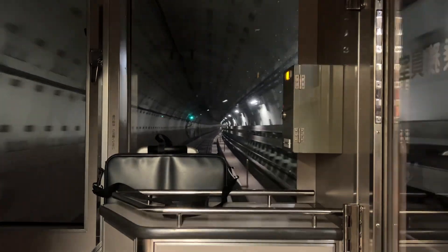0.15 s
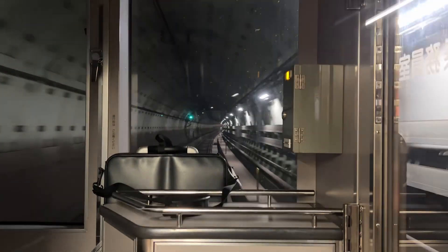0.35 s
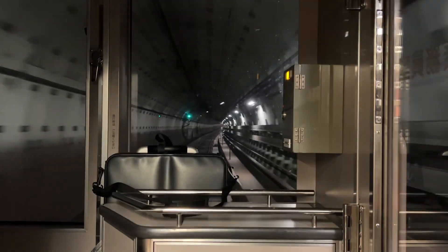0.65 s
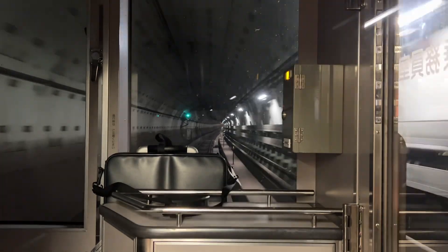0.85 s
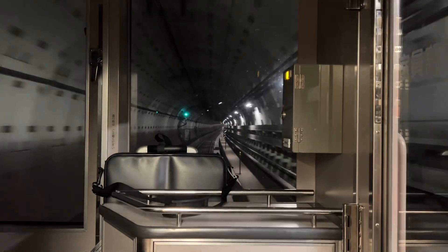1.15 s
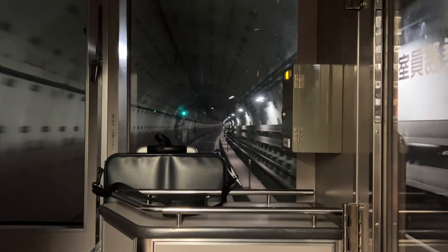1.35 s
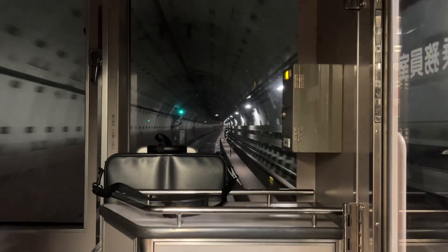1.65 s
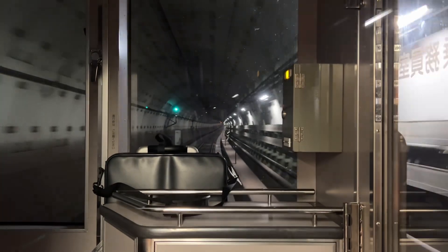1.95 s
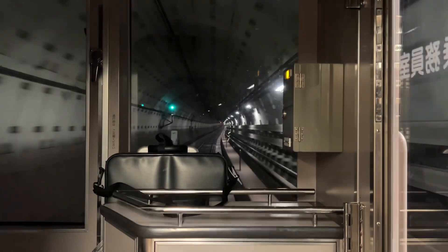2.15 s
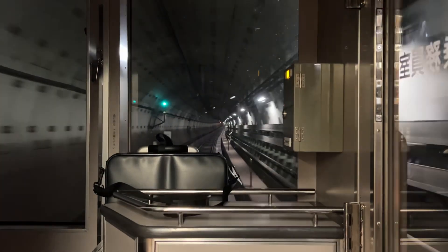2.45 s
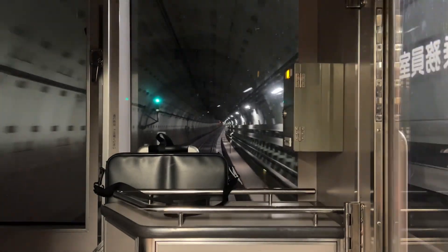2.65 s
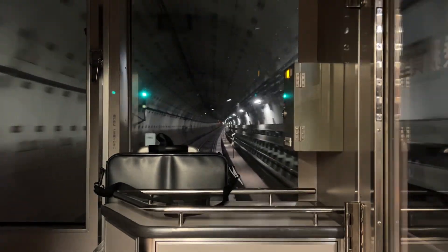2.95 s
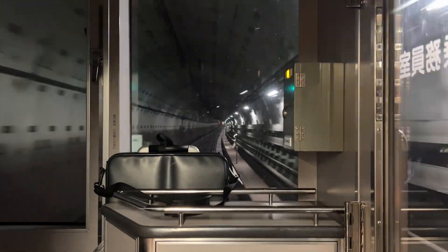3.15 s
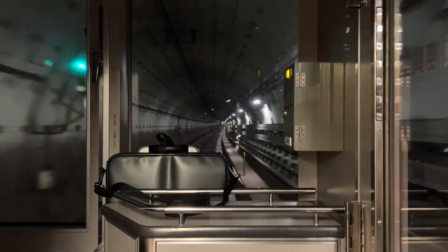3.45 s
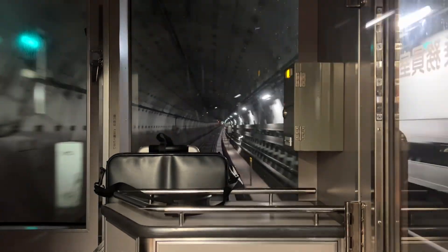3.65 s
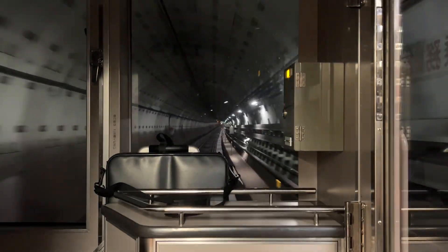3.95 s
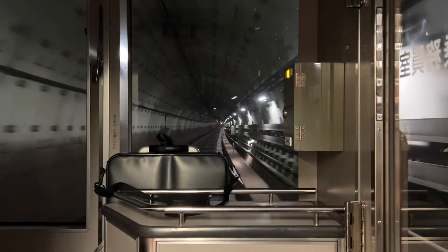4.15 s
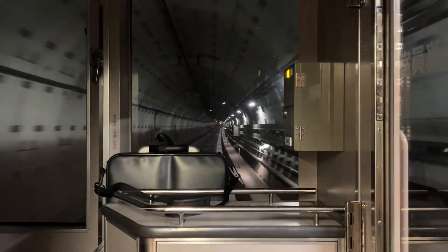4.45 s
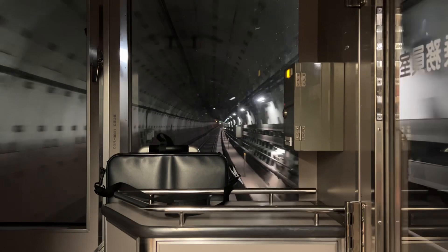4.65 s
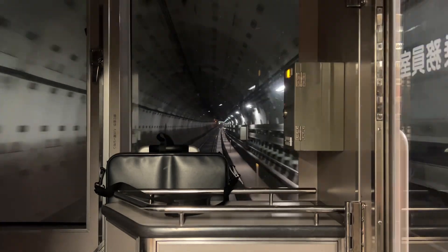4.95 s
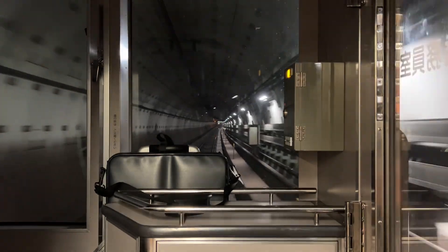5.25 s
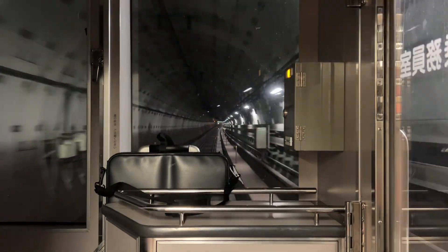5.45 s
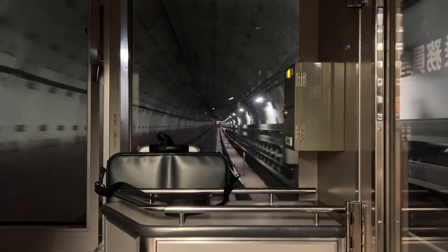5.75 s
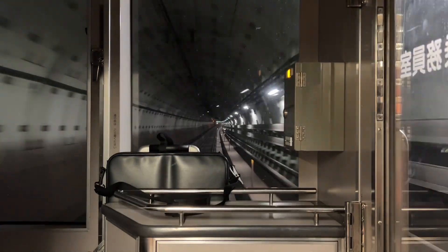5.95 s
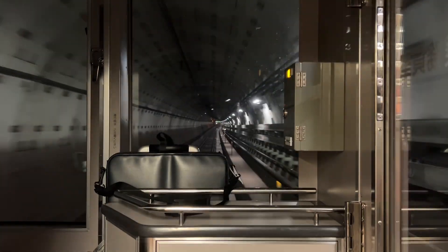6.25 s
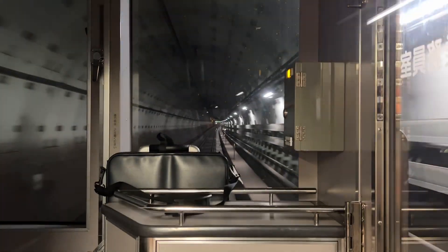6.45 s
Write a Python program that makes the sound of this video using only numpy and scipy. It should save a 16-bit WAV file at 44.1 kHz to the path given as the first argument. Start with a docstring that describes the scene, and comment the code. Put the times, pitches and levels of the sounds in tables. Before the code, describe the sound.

Inside the front car of an electric train in a tunnel, a close stereo microphone hears steady deep floor rumble, a muffled airy rush of wheels and a wavering low hum. From 0 to 1.4 seconds, cloth near the microphone rustles, scuffs and ticks in fine, crisp grains, then mostly quietens. The hum grows gently around 1.8 and 2.5 seconds, with a rougher boom near 3. A tiny dry tap sounds at about 3.3. From 3.7 the car body shudders in uneven booms; at about 4.1 and 4.2 two axles clatter over a rail joint, with short metallic ringing and heavy body thumps. It eases by 4.7, then a broader rush and panel roar swell around 5.1. Afterwards the rush recedes but the low boom remains strong and unsteady, with cloth rubbing more noticeably from 5.2, especially near 5.6 to 5.8, until the end at 6.6.

```python
"""Inside the front car of an electric train in a tunnel, heard through two microphone ports.
From the start the floor rumbles, wheels and tunnel rush, and rough rail makes the car body hum, boom and roar:
all are noise shaped by spectra or resonances. Cloth near the ports rustles, scuffs and ticks in fine noise grains.
A dry tap, a short ring, comes at about 3.3 s. From about 4.1 s two axles knock over a rail joint: noise and
fading tones sound the wheel resonances, and the body booms after each axle."""
import sys
import numpy as np
from scipy import signal
from scipy.fft import rfft, irfft, next_fast_len
from scipy.io import wavfile
from scipy.ndimage import uniform_filter1d, minimum_filter1d, map_coordinates

SR = 44100
rng = np.random.default_rng(int(sys.argv[2]) if len(sys.argv) > 2 else 0)


def persist_wave(psi):
    """Save psi, clipped to +-1, as 16-bit WAV."""
    counts = np.round(np.clip(psi, -1, 1) * 32767).astype(np.int16)
    wavfile.write(sys.argv[1], SR, np.atleast_2d(counts).T)


N = 291501

# Level of the lowest bass in the floor rumble: (time [s], level over the rest [dB])
DEEP_BASS = [(0, 4), (1, -2), (1.9, 2), (2.6, -1.5), (3.2, 1), (4.5, -4.5), (5.2, 0.5), (6, -8.5),
             (6.61, -7)]
# Rush of wheels and tunnel: (time [s], level [dB], its lower part over the rest [dB])
TUNNEL_RUSH = [(0, -34.5, 0.5), (.7, -35.5, 1.5), (1.4, -36.5, 1), (2.3, -36, -0.5), (3.3, -36, 0.5),
               (3.6, -38, 0), (4.04, -37, 2.5), (4.12, -28, -5), (4.19, -31, 6.5), (4.3, -29, -6.5),
               (4.45, -34.5, 5), (4.75, -38, 0), (4.88, -37.5, 3), (4.96, -31.5, 1), (5.08, -30, 0),
               (5.17, -31.5, 0), (5.3, -34, -2.5), (5.9, -34.5, 2.5), (6.2, -36.5, -7), (6.61, -37.5, -5)]
# Rail roughness under the car: (time [s], low boom [dB], upper boom [dB], panel roar [dB])
RAIL_ROUGHNESS = [(0.0,-34,-32.5,-34.5), (0.37,-26,-38,-34.5), (1.08,-30.5,-39.5,-34.5),
                  (1.5, -28, -29, -34), (1.7, -25.5, -29, -34), (1.82,-22.5,-24,-32),
                  (1.95, -27.5, -27, -34), (2.17,-27.5,-34.5,-36), (2.39,-32.5,-28.5,-34.5),
                  (2.47,-22,-27.5,-34.5), (2.83,-24.5,-29.5,-33.5), (2.93, -24, -25.5, -27),
                  (3.05,-21,-18.5,-24.5), (3.28,-25,-26.5,-32.5), (3.64,-28,-29.5,-34),
                  (3.7, -26.5, -21.5, -28), (3.74, -16, -22.5, -26), (3.78, -23.5, -15, -25),
                  (3.83, -14, -22.5, -25.5), (3.88, -16.5, -17, -25.5), (3.91, -23.5, -27.5, -26),
                  (3.95,-15.5,-13,-27), (4.03,-29.5,-29.5,-29), (4.11, -14.5, -27, -25),
                  (4.16,-16,-24.5,-26), (4.25,-20,-22,-25.5), (4.34, -15.5, -28.5, -27),
                  (4.37, -27, -20, -28.5), (4.4,-14.5,-31,-30.5), (4.55,-26.5,-26,-31), (4.7,-24,-24,-31),
                  (4.87,-24.5,-26.5,-33), (4.93,-19,-21,-24), (4.99, -20, -16, -23.5),
                  (5.03, -20, -22, -21.5), (5.07, -15, -16, -20.5), (5.12,-22.5,-18.5,-22.5),
                  (5.18, -18.5, -19, -23), (5.27,-20.5,-23,-25.5), (5.36, -19, -24.5, -26.5),
                  (5.7,-24,-25.5,-31), (5.8, -18.5, -27, -26.5), (5.84, -19.5, -25, -28.5),
                  (5.87,-15.5,-26.5,-26), (6.0, -18, -23, -26.5), (6.1, -17.5, -23.5, -27.5),
                  (6.27, -17.5, -24.5, -29.5), (6.5,-17,-25.5,-28.5), (6.61,-27.5,-29,-31.5)]
# Slow changes of the boom's colour: (time [s], gain of its lowest part [dB], gain of its highest part [dB])
BOOM_COLOUR = [(0, -8, 0.5), (.9, -9, -6), (1.5, 3.5, 0), (1.85, 5, -0.5), (2.3, 7, -3), (2.7, 3, 2.5),
               (3.05, 8, 6), (3.5, -7, 1), (3.75, -1.5, -5.5), (3.95, -2, -10), (4.1, 3, 1.5),
               (4.25, 4.5, 0.5), (4.42, -0.5, -6), (4.65, 8.5, -13), (4.95, 6, 3), (5.15, 9, 5.5),
               (5.4, -2, 1), (5.75, 2, 1.5), (6.0, 3, -3), (6.27, -8, 2), (6.5, 1, -6), (6.61, 7, 4)]
# Ripples worn into the rail pass under the wheels at a wandering rate: (time [s], rate [Hz])
RIPPLE_RATE = [(0, 200), (.45, 188.3), (.9, 188.6), (1.3, 196), (1.65, 180), (1.82, 227.5), (2.1, 225),
               (2.45, 190), (2.75, 231.7), (3.0, 214.5), (3.3, 239), (3.6, 195), (3.74, 195), (3.8, 233.7),
               (3.87, 215), (3.95, 226), (4.1, 239), (4.2, 231.9), (4.26, 190), (4.42, 212), (4.7, 210),
               (4.92, 222), (4.99, 245), (5.04, 180), (5.11, 245), (5.18, 239), (5.26, 210), (5.33, 203),
               (5.39, 235.4), (5.5, 190), (5.61, 227), (5.72, 195.5), (5.8, 209.8), (5.87, 204.3),
               (5.93, 185.2), (6.0, 212), (6.06, 189.6), (6.15, 215), (6.27, 232.4), (6.34, 203),
               (6.44, 208), (6.5, 174.8), (6.61, 205)]
# Cloth rubbing near the ports:
# (time [s], level [dB], relative top treble [dB], relative band near 5.4 kHz [dB])
CLOTH_RUB = [(0, -59.5, -2.5, -4), (.14, -42.5, -1.5, -16), (.3, -53, -2, -6), (.5, -50, -1, -6),
             (.6, -51, -5, -6), (.75, -57, -0.5, -10), (1.1, -59.5, -2.5, 2), (1.3, -58.5, -5.5, -6),
             (1.45, -61, -5, -20), (2.15, -55.5, -2, -1), (2.55, -53.5, -8, 5), (2.8, -60.5, -0.5, -5),
             (2.92, -52, -3, 6), (3.4, -48.5, -2, 3), (3.65, -59.5, -2, -1), (3.75, -55.5, -3, -3),
             (3.84, -49.5, -2.5, 6), (4.22, -50, -7.5, -1), (4.34, -59.5, -9.5, -7), (4.48, -61, -3, -8),
             (4.59, -63, -7, -8), (4.65, -53, -4.5, 6), (4.72, -50.5, -2.5, 9), (5.12, -49.5, -6, 0),
             (5.2, -45, -0.5, -10), (5.36, -49, 0, -6), (5.58, -42.5, -1, -6), (5.68, -45, -2.5, -1),
             (5.73, -46, 1.5, -4), (5.75, -40.5, 0, 8), (5.77, -44.5, 0, -3), (5.8, -52.5, -2.5, 6),
             (6.05, -54.5, -5.5, -5), (6.13, -48, 0, -2), (6.28, -47, 0.5, -6), (6.4, -51.5, 2.5, -5),
             (6.47, -45, 0, -6), (6.61, -56.5, -3.5, -6)]
# Scuffs of the cloth:
# (time [s], level [dB], time to fall 60 dB [s], relative low treble [dB], relative top treble [dB])
CLOTH_SCUFFS = [(0.0363, -46.5, .12, -3, -5.5), (0.096, -50, .14, -3, 2), (0.138, -46.5, .08, -7, 0),
                (0.1506, -38.5, 0.11, -8, -5), (0.2417, -46, .1, 2, 0.5), (0.3212, -46.5, .08, 2, 4.5),
                (0.34, -39, 0.085, 5, 3), (0.411, -46, 0.089, 0, 3), (0.4647, -50, .18, -3, -3.5),
                (0.484, -49, 0.13, 5, -5), (0.504, -48, .18, 9, 3.5), (0.632, -51, .06, -3, 5.5),
                (0.777, -56.5, .14, -2, 2), (0.8585, -48, 0.12, 8, -2), (0.9562, -56, .13, 0, 1),
                (0.9852, -49.5, 0.29, 0, 0), (1.138, -48, 0.12, 8, -8), (1.163, -55, .05, -6, 4.5),
                (1.2296, -50.5, 0.075, -7, 0), (1.2457, -49, .1, 0, 1.5), (1.258, -37, 0.18, 1, -2.5),
                (1.298, -53, 0.18, 4, 0), (1.3687, -49, 0.18, -9, 3), (2.941, -48, 0.12, 3, 1.5),
                (3.044, -49.5, 0.15, 0, 0), (5.172, -47, 0.18, -5, 4), (5.3, -46.5, 0.11, -5, 0),
                (5.45, -51.5, .12, -6, 4), (6.0035, -49, 0.19, 1, 0), (6.049, -51.5, .16, 4, -1),
                (6.4104, -49.5, .19, 2, -1)]
# Ticks of the cloth: (time [s], size of the snap before its colour is added [dB])
CLOTH_TICKS = [(0.141, -27), (0.3215, -27.5), (0.3415, -28.5), (0.4115, -28.5), (0.468, -32.5),
               (0.507, -29.5), (0.632, -32.5), (0.703, -32.5), (0.846, -19.5), (0.988, -34.5),
               (1.262, -28.5), (1.371, -22), (1.4004, -36), (3.6133, -28), (6.411, -23.5)]
# A dry tap in the car: (time [s], level [dB], pitch [Hz], time to fall 60 dB [s])
DRY_TAP = (3.2835, -15, 2400, .006)
# Two axles clatter over a joint: (time [s], level [dB], relative upper modes [dB])
AXLES_AT_JOINT = [(4.063, -17, 1.5), (4.204, -17, -2.5)]

# Resonances of the wheels, low car body and upper car body: (centre [Hz], width [Hz], level [dB])
WHEEL_MODES = [(773, 86, 2), (965, 130, -4), (1350, 78, -4.5), (1940, 100, -4), (2140, 217, -10),
               (2740, 250, -19.5), (3850, 390, -27.5), (5530, 450, -23.5)]
LOW_BODY_MODES = [(158, 40, -7), (203, 24, -1), (236, 18, 1)]
HIGH_BODY_MODES = [(272.3, 32, 2.5), (338.7, 39.5, 2), (371.3, 55, -3)]
# Spectra of the floor rumble, panel roar and tunnel rush: (frequency [Hz], relative level [dB])
FLOOR_SPECTRUM = [(11, -56.5), (18, -28.5), (36, -9.5), (49, -1), (93, 3), (108, -2), (125, -2.5),
                  (200, -4.5), (260, -29.5), (440, -120)]
PANEL_SPECTRUM = [(190, -36), (330, -12.5), (410, -2), (579, -5.5), (692, -4.5), (805, -16), (858, -12),
                  (1200, -34.5), (1560, -54.5), (2640, -120)]
RUSH_SPECTRUM = [(470, -14), (800, -1.5), (1000, -2.5), (1200, -5), (1360, -2), (1520, -7), (1680, -9.5),
                 (1800, -7), (1980, -9.5), (2150, -8.5), (2450, -8.5), (2850, -14), (3150, -18.5),
                 (3500, -26.5), (5000, -27.5), (6500, -36), (9000, -120)]
# Cloth spectra, for the ports' sum (mid) and difference (side): (frequency [Hz], relative level [dB])
CLOTH_MID_SPECTRUM = [(1900, -13), (3200, -2), (3800, -8.5), (5000, -7.5), (6600, 1.5), (7200, -3),
                      (8300, -3), (9000, -9), (9550, -26), (9700, -73), (10850, -73), (11050, -11),
                      (12300, -4), (15600, -13.5)]
CLOTH_SIDE_SPECTRUM = [(1900, -42), (3200, -5), (4450, -13.5), (5950, -10), (6300, -6.5), (6500, -28.5),
                       (6900, -24), (7700, -24), (8800, -11), (12200, -9), (12900, -31), (13500, -34),
                       (14100, -20), (15600, -16)]
# How far the ports disagree: (frequency [Hz], side minus mid [dB])
PORTS_APART = [(30, -16), (60, -23), (92, -26), (140, -21), (210, -12.5), (330, -3), (500, -5), (770, 0),
               (1170, 0), (1400, -1.5), (1750, 1), (2100, -13), (2450, -14), (2900, -4.5), (3500, -2),
               (4500, -4), (6400, -14)]
# Share of the side that is the mid arriving earlier on the left: (frequency [Hz], share, negative = later)
LEFT_LEAD = [(150, 0), (300, -.3), (560, -.3), (800, .3), (1030, .4), (1300, 0), (1640, -.4), (2000, 0),
             (3200, .4), (5000, 0)]
# Balance of the ports: (frequency [Hz], left minus right [dB])
PORT_LEAN = [(100, .3), (190, -.9), (400, -.8), (1400, -1.7), (2900, 2.3), (4900, 3.4), (6100, 1.3),
             (6600, 0)]

# Floor rumble: level, random sway, sways a second, dB gained per dB of boom
RUMBLE_DB, RUMBLE_SWAY_DB, RUMBLE_SWAYS, RUMBLE_FOLLOWS = -25.5, 1.5, 7.9, 0.13
RUSH_SWAY_DB, RUSH_SWAYS = 0.6, 5.3  # the rush sways a little: depth, sways a second
SING_DB = -8  # wheel modes singing in the rush: level over it
BOOM_SWAY_DB, BOOM_SWAYS = 1.5, 14  # the boom sways at random: depth, sways a second
BROAD_DB = -1.5  # gain of the broad shaking of the low modes
# Hum of the rail ripples: gain within the boom, spread, side over mid
RIPPLE_DB, RIPPLE_WIDTH_HZ, RIPPLE_SIDE_DB = -3.5, 18.8, -11.5
# Body boom after each axle: level over the clatter setting, lag, rise, time to fall 60 dB
THUMP_DB, THUMP_LAG_S, THUMP_RISE_S, THUMP_T60_S = 2.5, 0.014, 0.014, 0.1
PORT_LAG_S = 1 / 6700  # the cloth is nearer the right port
KNOCKS, KNOCK_GAP_S, KNOCK_T60_S = 3, 0.02, 0.26  # each axle: knocks, spacing, time to fall 60 dB
WHEEL_SHARP = 1.25  # above 1 the clatter has darker valleys between the wheel modes
# Free ringing after each knock: least gain, largest random extra gain, time to fall 60 dB
RING_DB, RING_EXTRA_DB, RING_T60_S = -7.3, 7.4, 0.19
TOP_HZ = 15750  # nothing is kept above this


def amp(db):
    """Turns decibels into gain."""
    return 10 ** (np.asarray(db) / 20)


def unit(x):
    """Scales a sound to an average (rms) size of 1."""
    return x / np.sqrt(np.mean(x ** 2) + 1e-20)


def along(points, hz):
    """Reads (frequency, value) points at any pitch, evenly along a log scale."""
    f, v = np.transpose(points)
    return np.interp(np.log(hz + 1), np.log(f + 1), v)


def curves(rows):
    """Draws lines through a table: one value per sample for each column after the time."""
    s, *cols = np.transpose(rows)
    return [np.interp(np.arange(N) / SR, s, c) for c in cols]


def wobble(rate):
    """A smooth random curve with this many random points a second."""
    points = rng.standard_normal(int(N * rate / SR) + 4)
    return map_coordinates(points, [np.arange(N) * rate / SR])


def filtered(x, response):
    """Strengthens or weakens each frequency of x by the response."""
    m = next_fast_len(N + SR // 2)
    return irfft(rfft(x, m) * response(np.fft.rfftfreq(m, 1 / SR)), m)[..., :N]


def modes(table):
    """Adds resonances, each strongest at its own pitch, with alternating signs."""
    def response(f):
        return sum((-1) ** k * amp(db) * 1j * f * w / (c * c - f * f + 1j * f * w)
                   for k, (c, w, db) in enumerate(table))
    return response


def shape(points):
    """A response that follows a spectrum."""
    return lambda hz: amp(along(points, hz))


def field(response, patchy_db):
    """Noise, uneven over time and pitch, shaped into (mid, side) with mid at average size 1."""
    grid = signal.stft(rng.standard_normal((2, N)), nperseg=1024)[2]
    patches = rng.standard_normal(grid.shape[1:])
    for axis in (0, 1):
        patches = uniform_filter1d(patches, size=5, axis=axis)
    mid, other = signal.istft(grid * amp(patchy_db * unit(patches)), nperseg=1024)[1][:, :N]

    def spread(hz):
        lead = np.clip(along(LEFT_LEAD, hz), -1, 1)
        apart = amp(along(PORTS_APART, hz))
        # 1j moves each wave a quarter cycle earlier
        return response(hz) * [np.ones_like(hz), 1j * lead * apart, np.sqrt(1 - lead ** 2) * apart]
    mid, early, free = filtered(np.array([mid, mid, other]), spread)
    return np.array([mid, early + free]) / np.std(mid)


def swell(s, rise, t60):
    """An envelope that rises from time s and dies away."""
    t = np.maximum(np.arange(N) / SR - s, 0)
    return (1 - np.exp(-t / rise)) * amp(-60 * t / t60)


def steadied(pair, seconds, share):
    """Evens out part of the slow beating of narrow noise."""
    level = np.sqrt(np.abs(uniform_filter1d(pair ** 2, size=int(seconds * SR), axis=1))) + 1e-6
    even = pair * (np.std(pair, axis=1, keepdims=True) / level) ** np.clip(share, 0, 1)
    return even / np.std(even[0])


def floor_rumble():
    """The floor shakes at low pitches, a little harder when the rail makes the body boom."""
    boom_db = curves(RAIL_ROUGHNESS)[0]
    follow_db = RUMBLE_FOLLOWS * (boom_db - boom_db.mean())
    level = amp(RUMBLE_DB + follow_db + RUMBLE_SWAY_DB * wobble(RUMBLE_SWAYS))
    rumble = level * steadied(field(shape(FLOOR_SPECTRUM), patchy_db=-2.5), seconds=0.067, share=0.65)
    bass = filtered(rumble, lambda hz: 1 / (1 + (hz / 58) ** 6))
    return rumble + (amp(curves(DEEP_BASS)[0]) - 1) * bass


def tunnel_rush():
    """Wheels and tunnel make a rush that swells around the joint and again near 5 s; wheel modes sing in it."""
    rush_db, low_db = curves(TUNNEL_RUSH)

    def sing_band(hz):
        return modes(WHEEL_MODES)(hz) / (1 + (1500 / (hz + 1)) ** 6) / (1 + (hz / 3000) ** 10)
    sing = amp(SING_DB + 1.0 * wobble(17)) * field(sing_band, patchy_db=2.0)
    rush = field(shape(RUSH_SPECTRUM), patchy_db=1.1)
    lower = filtered(rush, lambda hz: 1 / (1 + (hz / 1150) ** 10))
    rush = rush + (amp(low_db) - 1) * lower
    return amp(rush_db + RUSH_SWAY_DB * wobble(RUSH_SWAYS)) * (rush + sing)


def ripple_hum():
    """Rail ripples give a narrow, unsteady tone at the rate they pass under the wheels."""
    turn = 2 * np.pi * np.cumsum(curves(RIPPLE_RATE)[0]) / SR
    slow = filtered(rng.standard_normal((4, N)), lambda hz: np.exp(-(hz / RIPPLE_WIDTH_HZ) ** 2))
    tone = slow[:2] * np.cos(turn) + slow[2:] * np.sin(turn)
    return steadied(tone, seconds=0.11, share=0.45) * amp([[0], [RIPPLE_SIDE_DB]])


def low_boom():
    """Rough rail shakes the low body modes: a broad boom mixed with the ripple hum."""
    def low(hz):
        return modes(LOW_BODY_MODES)(hz) / (1 + (hz / 300) ** 4) / (1 + (125 / (hz + 1)) ** 6)
    # the boom holds steadier than plain noise
    boom = steadied(field(low, patchy_db=0.4), seconds=0.1, share=0.65)
    lowest_db, highest_db = curves(BOOM_COLOUR)
    lowest = filtered(boom, lambda hz: hz < 184)
    highest = filtered(boom, lambda hz: hz > 219)
    boom = boom + (amp(lowest_db) - 1) * lowest + (amp(highest_db) - 1) * highest
    return amp(BROAD_DB) * boom + amp(RIPPLE_DB) * ripple_hum()


def body():
    """Rough rail and the joint shake the car: body modes boom and panels roar above them."""
    def high(hz):
        return modes(HIGH_BODY_MODES)(hz) / (1 + (hz / 430) ** 4) / (1 + (220 / (hz + 1)) ** 6)
    boom_db, upper_db, roar_db = curves(RAIL_ROUGHNESS)
    boom = low_boom()
    upper = steadied(field(high, patchy_db=-1.5), seconds=0.29, share=0.13)
    roar = steadied(field(shape(PANEL_SPECTRUM), patchy_db=-2.0), seconds=0.084, share=1.0)
    thumps = sum(amp(db + THUMP_DB) * swell(s + THUMP_LAG_S, THUMP_RISE_S, THUMP_T60_S)
                 for s, db, _ in AXLES_AT_JOINT)
    boom_level = amp(boom_db + BOOM_SWAY_DB * wobble(BOOM_SWAYS)) + thumps
    return boom_level * boom + amp(upper_db) * upper + amp(roar_db) * roar


def cloth():
    """Fibres slip in fine grains; scuffs start sharply; ticks are single snaps."""
    rub_db, bright_db, band_db = curves(CLOTH_RUB)
    rub = amp(rub_db + 1.3 * wobble(45) + 0.61 * wobble(11))
    scuffs, low, high = sum(np.outer(amp([db, db + low_db, db + top_db]), swell(s, 0.0016, t60))
                            for s, db, t60, low_db, top_db in CLOTH_SCUFFS)
    level = rub + scuffs
    grains = rng.standard_normal((2, N)) * amp(0.84 * wobble(650))
    near, scattered = level * unit(grains)
    for s, db in CLOTH_TICKS:
        snap = np.zeros(N)
        snap[round(s * SR)] = amp(db)
        near = near + snap
    drive = np.array([near, 0.48 * near + 0.66 * scattered])

    # mid and side have their own colours; their signs follow the lag between the ports
    scale = np.sqrt(np.mean(shape(CLOTH_MID_SPECTRUM)(np.linspace(0, SR / 2, num=999)) ** 2))

    def colour(hz):
        turn = np.pi * hz * PORT_LAG_S
        mid = shape(CLOTH_MID_SPECTRUM)(hz) * np.sign(np.cos(turn))
        side = -1j * amp(2.5) * shape(CLOTH_SIDE_SPECTRUM)(hz) * np.sign(np.sin(turn))
        return np.array([mid, side]) / scale

    def part(weight):
        return filtered(drive, lambda hz: weight(hz) * colour(hz))

    # scuffs carry more low treble
    heavy = low / level * part(lambda hz: np.exp(-((hz - 4500) / 800) ** 2))
    main = part(lambda hz: hz <= 10300)
    top = (amp(bright_db) * rub + high) / level * part(lambda hz: hz > 10300)
    band = amp(band_db) * part(lambda hz: np.exp(-((hz - 5430) / 300) ** 2))
    return heavy + main + top + band


def tap():
    """One quickly fading ring with a brighter edge, a little to the left."""
    s, db, hz, t60 = DRY_TAP
    turn = 2 * np.pi * hz * (np.arange(N) / SR - s)
    tones = np.sin(turn) + 0.3 * np.sin(1.35 * turn) + 0.2 * np.sin(1.75 * turn)
    ring = amp(db) * swell(s, 0.0006, t60) * tones
    return np.outer([1, 0.3], filtered(ring, lambda f: f < 8000))


def wheel_rings(knocks):
    """Each knock sets the wheel modes ringing freely, at slightly random pitch and strength."""
    t = np.arange(N) / SR
    chance = rng.random((len(knocks), len(WHEEL_MODES), 3))
    rings = np.zeros(N)
    for (s, db), row in zip(knocks, chance):
        for (hz, width, mode_db), (size, turn, off) in zip(WHEEL_MODES, row):
            level = amp(db + RING_DB + mode_db + RING_EXTRA_DB * size)
            pitch = hz + (off - 0.5) * width
            rings += level * swell(s, 0.015, RING_T60_S) * np.sin(2 * np.pi * (pitch * t + turn))
    return np.outer([1, 0.5], rings)


def joints():
    """Each knock drives the wheel modes with a short burst of rough contact; the floor muffles the top."""
    def wheel(hz):
        response = modes(WHEEL_MODES)(hz)
        return response * np.abs(response) ** (WHEEL_SHARP - 1)
    knocks = [(s + k * KNOCK_GAP_S, db) for s, db, _ in AXLES_AT_JOINT for k in range(KNOCKS)]
    # overlapping knocks add as power
    drive = np.sqrt(sum((amp(db) * swell(s, 0.018, KNOCK_T60_S)) ** 2 for s, db in knocks))
    clatter = drive * steadied(field(wheel, patchy_db=3.5), seconds=0.04, share=0.6)
    clatter = clatter + wheel_rings(knocks)
    upper = filtered(clatter, lambda hz: (hz > 1620) & (hz < 2100))
    upper_db = curves([(s + 0.05, db) for s, _, db in AXLES_AT_JOINT])[0]
    clatter = clatter + (amp(upper_db) - 1) * upper
    return filtered(clatter, lambda hz: 1 / (1 + (hz / 4500) ** 2) / (1 + (hz / 7600) ** 12))


def limited(x, top):
    """Gain control looks ahead and eases the loudest surges toward the top."""
    need = np.minimum(1, top / (np.abs(x).max(axis=0) + 1e-9))
    lowest = minimum_filter1d(need, size=661)  # a window of about 15 ms
    return x * uniform_filter1d(lowest, size=661)


def scene():
    """All sources, turned from mid and side into left and right."""
    mid, side = floor_rumble() + tunnel_rush() + body() + cloth() + tap() + joints()
    return np.array([mid + side, mid - side])


def record(dry):
    """The ports lean right in the middle and left in the low treble; then a limiter and a band limit."""
    leaning = filtered(dry, lambda hz: amp(np.outer([0.5, -0.5], along(PORT_LEAN, hz))))
    held = limited(leaning, top=0.9)
    return filtered(held, lambda hz: hz < TOP_HZ)


dry = scene()
out = record(dry)
persist_wave(out)
```